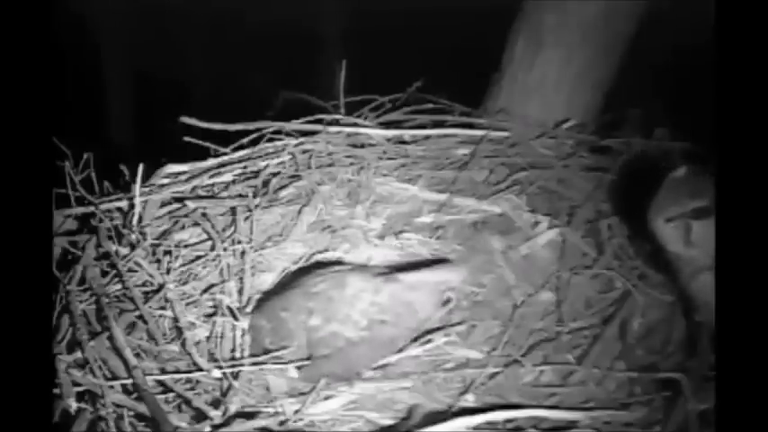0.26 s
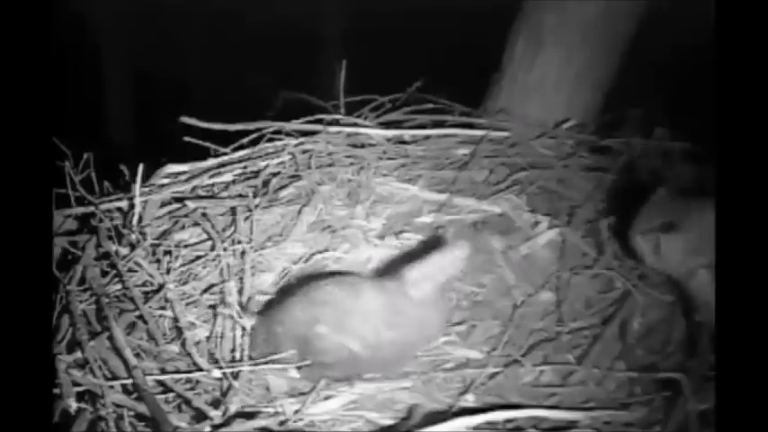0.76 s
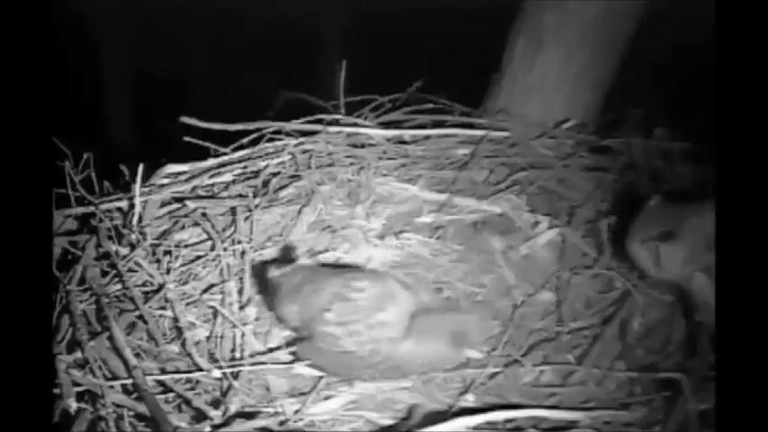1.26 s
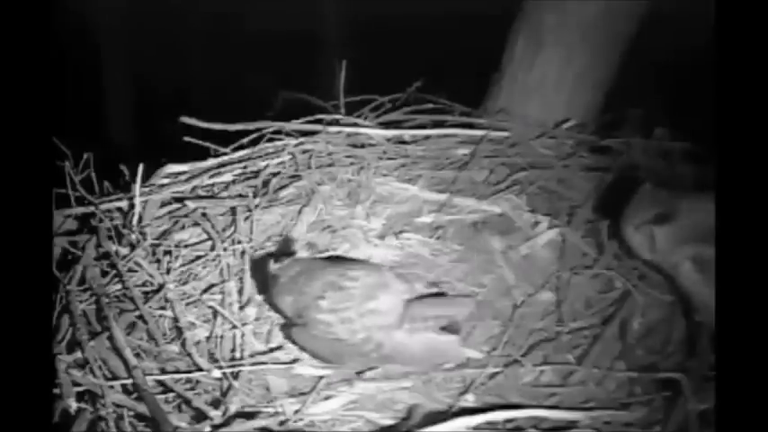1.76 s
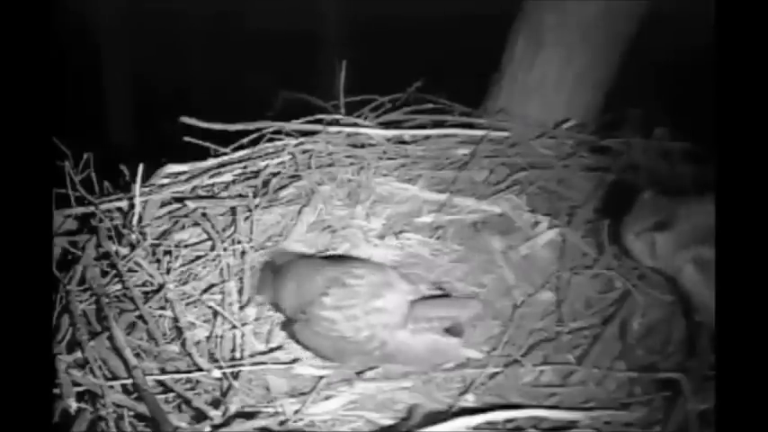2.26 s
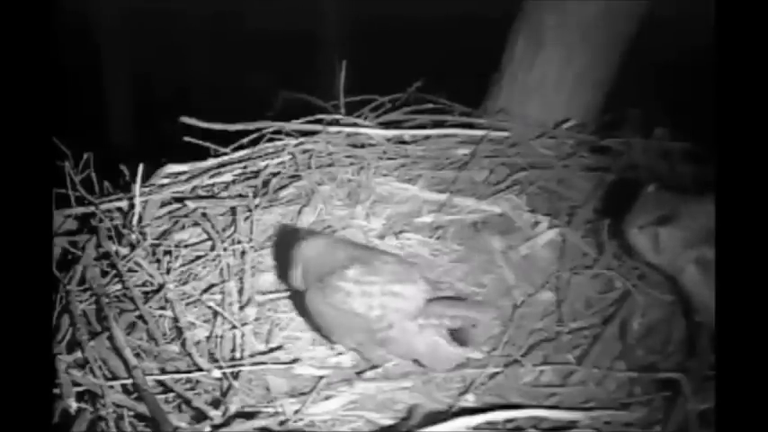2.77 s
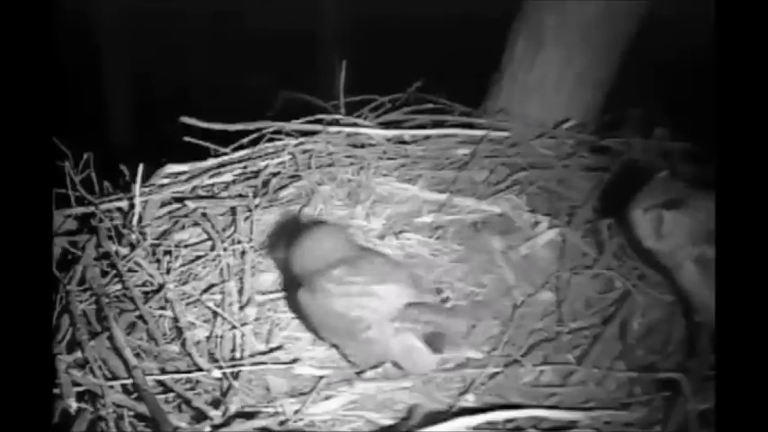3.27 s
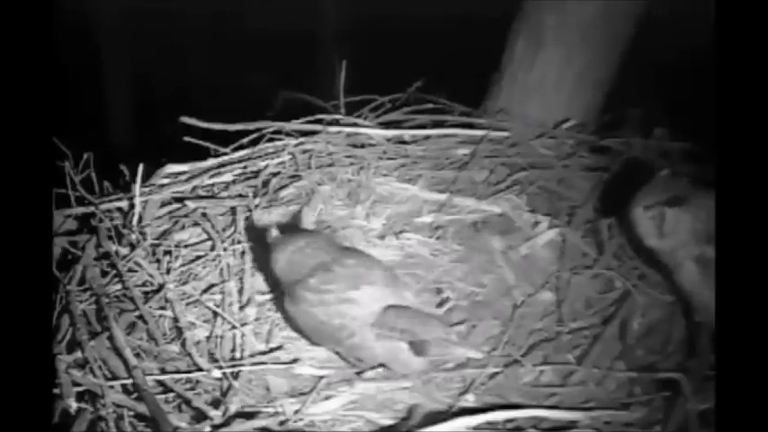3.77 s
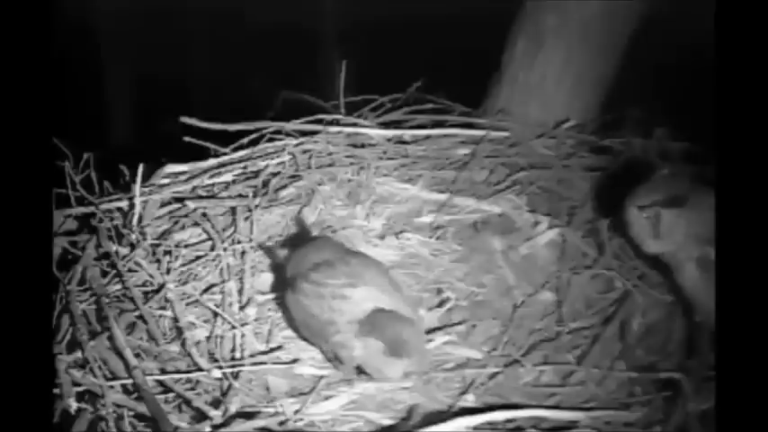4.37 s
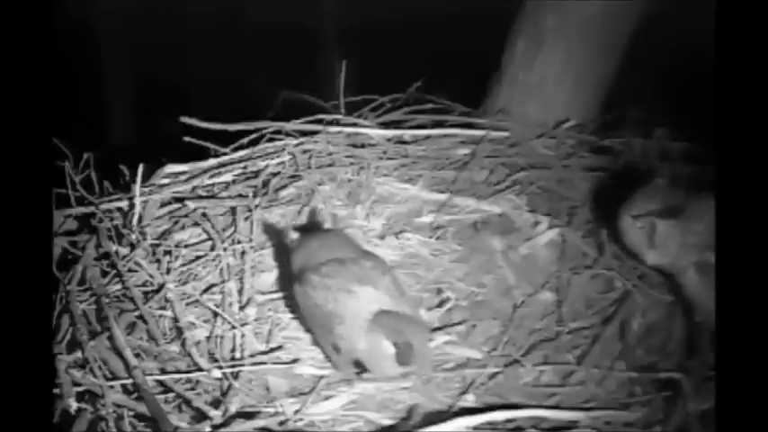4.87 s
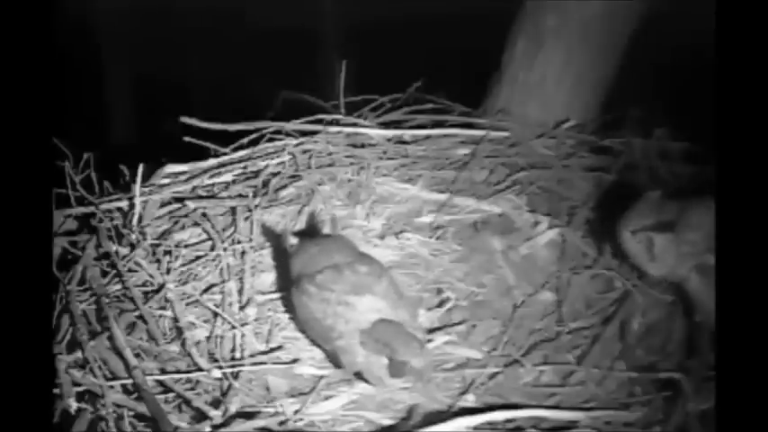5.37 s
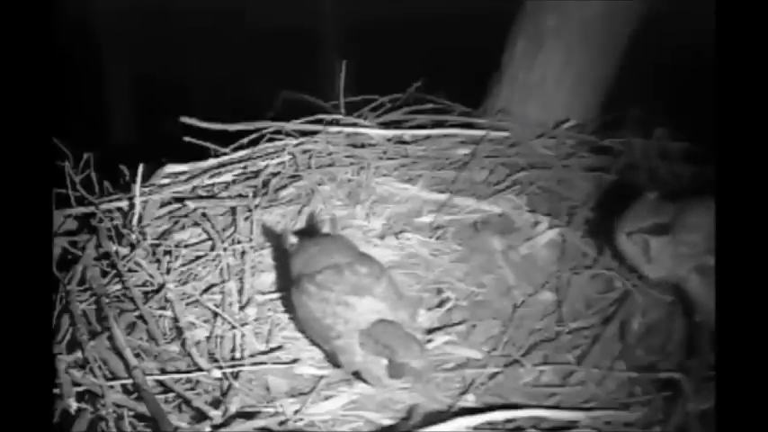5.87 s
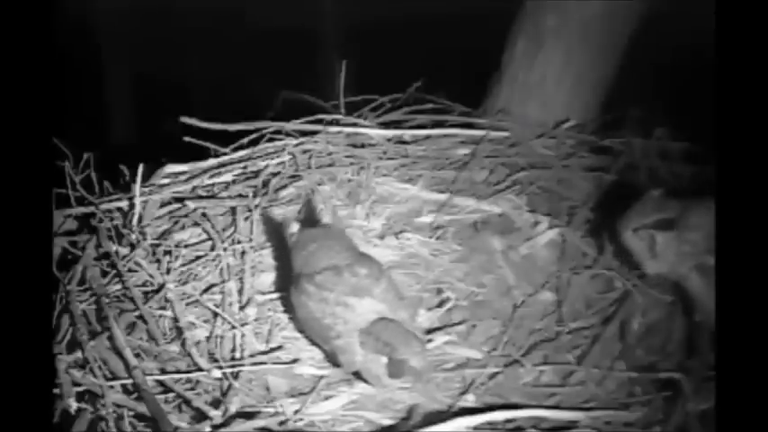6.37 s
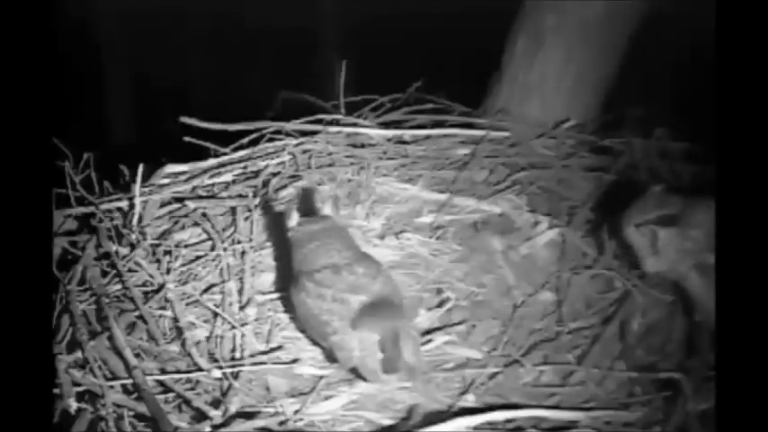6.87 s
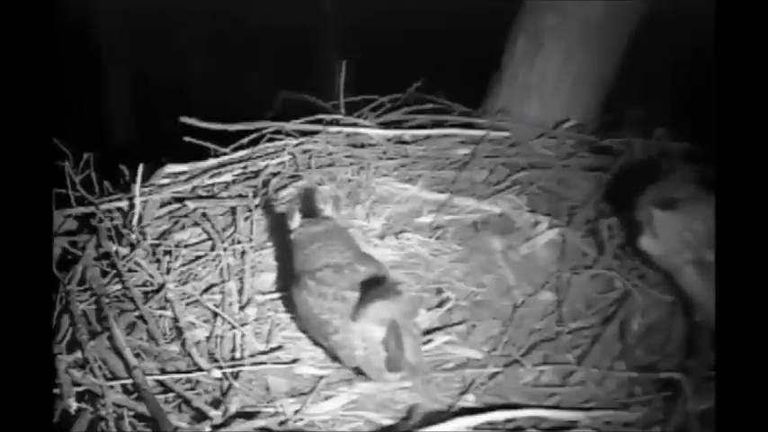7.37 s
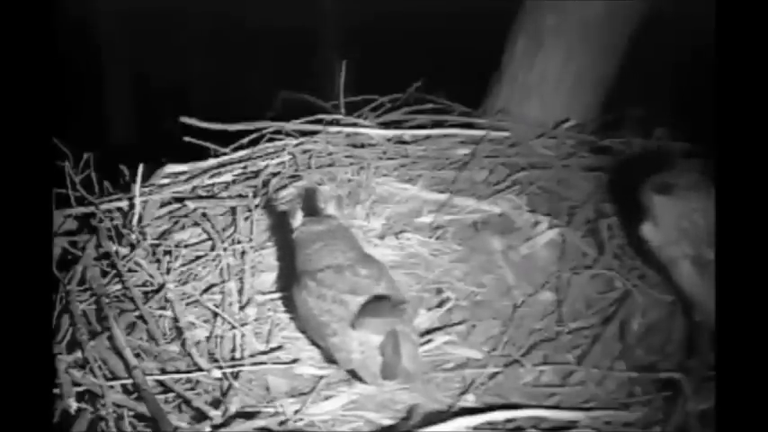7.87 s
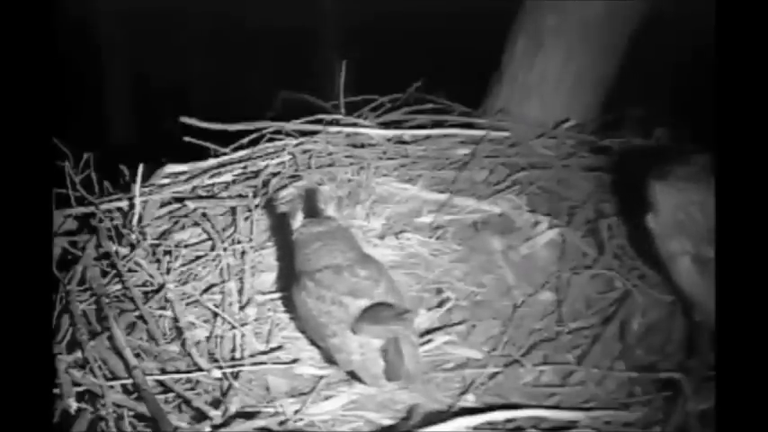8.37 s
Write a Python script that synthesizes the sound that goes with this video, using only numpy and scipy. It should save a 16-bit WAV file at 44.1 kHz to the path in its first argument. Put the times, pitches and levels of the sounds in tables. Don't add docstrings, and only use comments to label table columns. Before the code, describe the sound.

Close, slightly overdriven owl hoots, quick and high, then short low notes and two long deep hoots, fading into windy night hiss.

```python
import sys
import numpy as np
from scipy import signal
from scipy.fft import rfft, irfft, next_fast_len
from scipy.io import wavfile
from scipy.ndimage import uniform_filter1d, map_coordinates

SR = 44100
rng = np.random.default_rng(int(sys.argv[2]) if len(sys.argv) > 2 else 0)


def volts(x):
    e = np.asarray(x, float) / 20
    return 10 ** e


def to_wav(s):
    ch = np.atleast_2d(s).T
    pcm = np.round(np.clip(ch, -1, 1) * 32767)
    wavfile.write(sys.argv[1], SR, pcm.astype(np.int16))


N = 380583
TIME = np.arange(N) / SR
MAINS = 2 * np.pi * 60 * TIME


def along(points, hz):
    f, v = np.transpose(points)
    return np.interp(np.log(hz + 1), np.log(f + 1), v)


def unit(x):
    return x / np.sqrt(np.mean(x ** 2) + 1e-20)


def wobble(rate):
    knots = rng.standard_normal(int(N * rate / SR) + 4)
    return map_coordinates(knots, [np.arange(N) * rate / SR])


def filtered(x, response):
    m = next_fast_len(N + SR // 2)
    return irfft(rfft(x, m) * response(np.fft.rfftfreq(m, 1 / SR)), m)[..., :N]


def noise(spectrum):
    return unit(filtered(rng.standard_normal(N), lambda hz: volts(along(spectrum, hz))))


def circuit(hz):
    centre_hz, width_hz, lag_hz, coupling_hz, corner_hz = 332.3, 181, 207.8, 429.0, 12900
    resonance = 1j * hz * width_hz / (centre_hz ** 2 - hz ** 2 + 1j * hz * width_hz)
    tuned = resonance / (1 + 1j * hz / lag_hz)
    leak = -.048 + 0.019 * 1j * hz / centre_hz / (1 + 1j * hz / corner_hz)
    coupling = 1j * hz / (coupling_hz + 1j * hz)
    lift = np.sqrt(1 + (262 / (hz + 40)) ** 4)
    return 6.74 * lift * coupling * coupling * (tuned + leak)


def ahead(x):
    return filtered(x, lambda hz: 1 / (np.abs(circuit(hz)) + 0.047))


def wind():
    # time in seconds, strength in dB
    strength = [(0, -42.5), (.75, -41.5), (1, -45.5), (2.7, -43.5), (3.2, -44.5), (3.85, -37.5),
                (4.55, -37.5), (5, -39), (5.4, -35.5), (5.8, -40), (6.1, -37.5), (6.5, -36), (7.4, -37),
                (7.9, -38), (8.3, -38.5), (8.63, -40)]
    # frequency in Hz, density in dB per Hz
    rumble_colour = [(30, -58), (120, -27.5), (190, -8), (240, -4), (361, -2.5), (518, -9.5), (689, -19.5),
                     (800, -26), (1100, -54), (1500, -54), (2400, -120)]
    # frequency in Hz, density in dB per Hz
    buffet_colour = [(15, -37), (50, -25), (100, -6), (170, 1.5), (230, 0.5), (400, -44), (600, -100)]
    calm_db, buffet_db, buffet_growth = -37, -49, 2.07
    at, db = np.transpose(strength)
    wind_db = np.interp(TIME, at, db)
    flutter_db = np.clip(1.8 * wobble(30) + 1.4 * wobble(110), -9, 4)
    rumble = unit(volts(wobble(5) + flutter_db) * noise(rumble_colour))
    gust_db = buffet_db + buffet_growth * (wind_db - calm_db) + 2.0 * wobble(12)
    return volts(wind_db + 1.0) * rumble + volts(gust_db) * noise(buffet_colour)


def hum(busy):
    # multiple of the mains frequency, level in dB rms
    harmonics = [(3, -57.5), (4, -57), (5, -47.5), (6, -47.5), (7, -52.5)]
    tones = sum(np.sqrt(2) * volts(db) * np.sin(k * MAINS + k * k) for k, db in harmonics)
    return volts(-0.7 - 6.5 * busy) * tones


def hiss(busy):
    # frequency in Hz, density in dB per Hz
    hiss_colour = [(300, -10), (900, 2), (1400, -2), (2260, -4), (4000, -3.5), (6000, -2), (8000, -4.5),
                   (10300, -4), (11000, -6.5), (11100, -91)]
    spikes = 1 + 2.06 * np.cos(MAINS) ** 12 * volts(3 * wobble(97))
    fizz = filtered(spikes * noise(hiss_colour),
                    lambda hz: np.clip((hz - 5000) / 3000, 0, 1) * (hz < SR / 4))
    rest_db, sag_db = -57.5, 5
    return volts(rest_db - sag_db * busy + 2) * unit(noise(hiss_colour) + fizz)


def whistle(busy):
    line_hz, rest_db, sag_db = 15734.5, -65, 7
    chop = 1 + 0.7 * np.cos(MAINS + 3.0) + 0.084 * np.cos(2 * MAINS)
    tone = np.sin(2 * np.pi * line_hz * TIME) / np.abs(circuit(line_hz))
    return volts(rest_db - sag_db * busy + 8) * chop * tone


def tension(hoots, rest_hz, rise_s, sag_per_s):
    waver_hz, waver_peak_s, waver_dies_s = 6.14, .089, .104
    start, length, aim, waver, release = np.transpose(hoots)[..., None]
    since = np.clip(np.arange(0, N, 16) / SR - start, 0, length)
    swing = np.cos(2 * np.pi * waver_hz * (since - waver_peak_s))
    ring = waver * np.exp(-since / waver_dies_s) * swing
    rise = 1 - np.exp(-since / rise_s)
    let_go = 1 - np.exp((since - length) / release)
    shape = rise * (1 + ring - sag_per_s * since) * let_go
    hz = rest_hz + np.max((aim - rest_hz) * shape, axis=0)
    return uniform_filter1d(np.repeat(hz, repeats=16)[:N], size=401)


def owl(pitch, voice, octave_turn, jitter):
    at, low_db, octave_db = np.transpose(voice)
    hz = pitch * (1 + 0.0022 * wobble(60) + jitter * wobble(700))
    phase = 2 * np.pi * np.cumsum(hz) / SR
    rising = np.tanh(np.gradient(pitch) * SR / 2500)
    low_level = volts(np.interp(pitch, at, low_db) + 1.5 * rising)
    octave_level = volts(np.interp(pitch, at, octave_db) + 1.74 * rising)
    low = low_level / np.abs(circuit(hz)) * np.sin(phase)
    octave = octave_level / np.abs(circuit(2 * hz)) * np.sin(2 * phase + octave_turn)
    return np.sqrt(2) * (low + octave)


def high_owl():
    # start in seconds, length in seconds, aimed pitch in Hz, waver share, release in seconds
    high_hoots = [
        (.768, .209, 361, .66, .056),
        (1.091, .192, 440, .37, .089),
        (1.281, .224, 430, .46, .1),
        (1.417, .258, 399, .11, .025),
        (2.173, .454, 384, .36, .022),
        (2.876, .24, 369, .2, .022),
    ]
    # pitch in Hz, fundamental in dB, octave in dB
    high_voice = [(197, -78, -67.5), (205, -53.5, -41), (270.7, -25, -33.5), (319.4, -16.5, -33),
                  (355.4, -8.5, -30), (405, -6, -30.5)]
    pitch = tension(high_hoots, rest_hz=200, rise_s=.025, sag_per_s=.286)
    return owl(pitch, high_voice, octave_turn=2.91, jitter=.007)


def deep_owl():
    # start in seconds, length in seconds, aimed pitch in Hz, waver share, release in seconds
    deep_hoots = [
        (3.052, .104, 300, 0, .05),
        (3.411, .12, 320, 0, .046),
        (3.553, .092, 339, 0, .045),
        (3.623, .095, 288, 0, .027),
        (3.692, .094, 271, 0, .045),
        (4.607, .372, 283, 0, .036),
        (5.414, .334, 282, 0, .031),
    ]
    # pitch in Hz, fundamental in dB, octave in dB
    deep_voice = [(150, -76, -65), (162.3, -59, -26.5), (198, -40.5, -19), (222.7, -30, -24),
                  (253.6, -22.5, -24.5), (289.7, -10, -22.5)]
    pitch = tension(deep_hoots, rest_hz=150, rise_s=.023, sag_per_s=-.03)
    return owl(pitch, deep_voice, octave_turn=2.5, jitter=.018)


def trees(x):
    # frequency in Hz, time to fall by 60 dB in seconds
    decay = [(150, 0.8), (1000, 0.26)]
    hz, t, z = signal.stft(rng.standard_normal(SR // 2), SR, nperseg=256)
    fall_db = -60 * t / along(decay, hz)[:, None] - 0.035 * hz[:, None] + 8.0
    tail = signal.istft(z * volts(fall_db), SR, nperseg=256)[1]
    late = np.pad(x, (round(.12 * SR), 0))
    return signal.fftconvolve(late, tail / np.sqrt(SR / 30))[:N]


def ducking(x):
    recover_s, loaded_db = 0.41, -23
    keep = np.exp(-1 / (recover_s * SR))
    power = signal.lfilter([1 - keep], [1, -keep], x ** 2)
    return np.tanh(power / volts(2 * loaded_db))


def scene():
    birds = high_owl() + deep_owl()
    busy = ducking(np.clip(birds, -.13, .13))
    night = ahead(wind() + hum(busy) + hiss(busy)) + whistle(busy)
    return np.tile(birds + volts(-29.5) * trees(birds) + night, (2, 1))


def top_cut(x):
    return signal.sosfilt(signal.butter(12, 15800, fs=SR, output="sos"), x)


def record(dry):
    # frequency in Hz, level in dB
    folded_top = [(11000, -91.5), (11200, -22), (13000, -29.5), (15000, -44), (16000, -89)]
    railed = np.clip(dry[0], -.14, .12)
    sampled = filtered(railed, circuit) * (1 + np.cos(np.pi * np.arange(N)))
    lowpass = [(10300, 0), (11000, -10.5), (11250, -35), (11500, -90)]
    smooth = filtered(sampled, lambda hz: volts(along(lowpass, hz)))
    loudness = uniform_filter1d(np.abs(smooth), size=801) / 0.12
    air = filtered(sampled, lambda hz: volts(along(folded_top, hz)))
    smooth = smooth + np.clip(loudness, 0, 1.1) ** 11 * air
    side = [(100, -35.5), (340, -25.5), (610, -30.5), (1000, -36.5)]
    mismatch = filtered(smooth, lambda hz: volts(along(side, hz)))
    return top_cut(np.array([smooth + mismatch, smooth - mismatch]))


dry = scene()
out = record(dry)
to_wav(out)
```